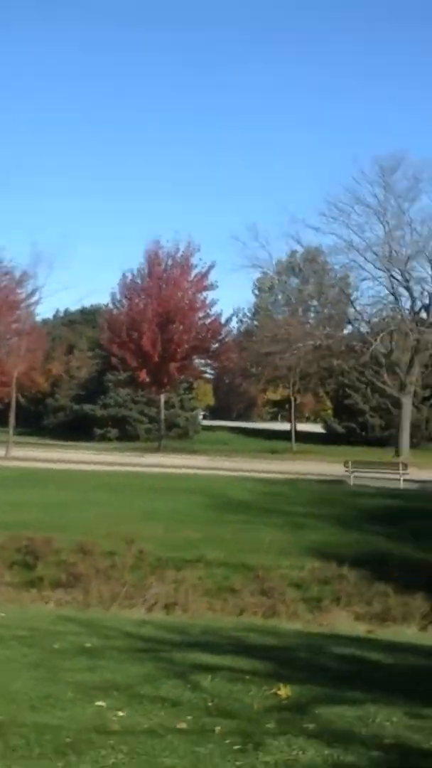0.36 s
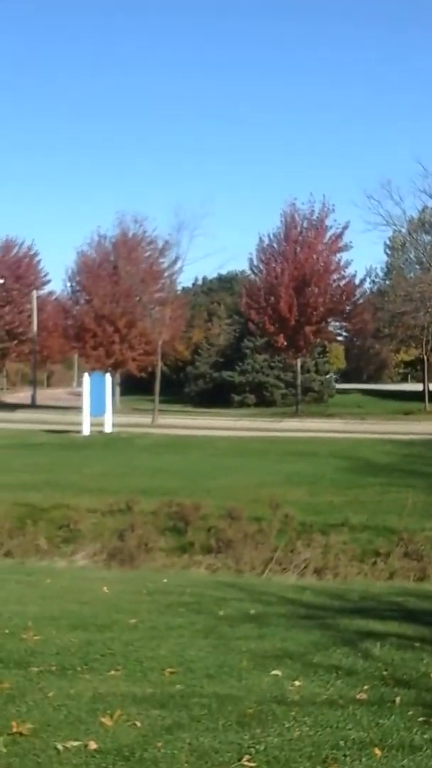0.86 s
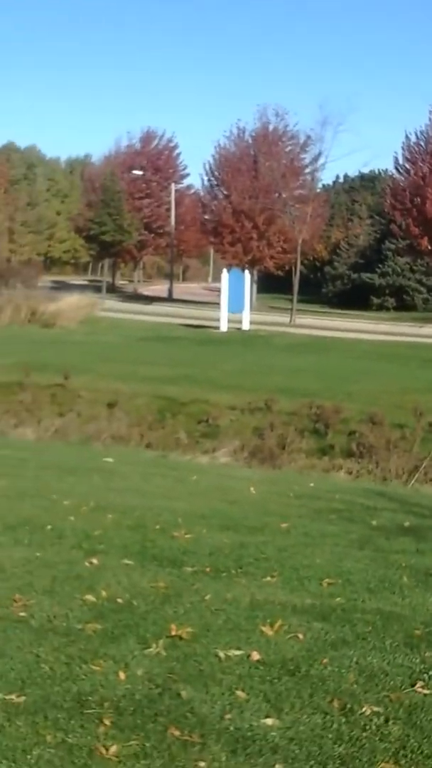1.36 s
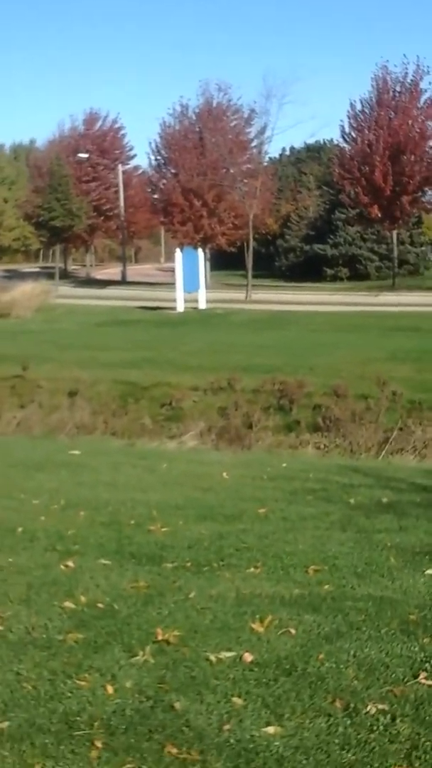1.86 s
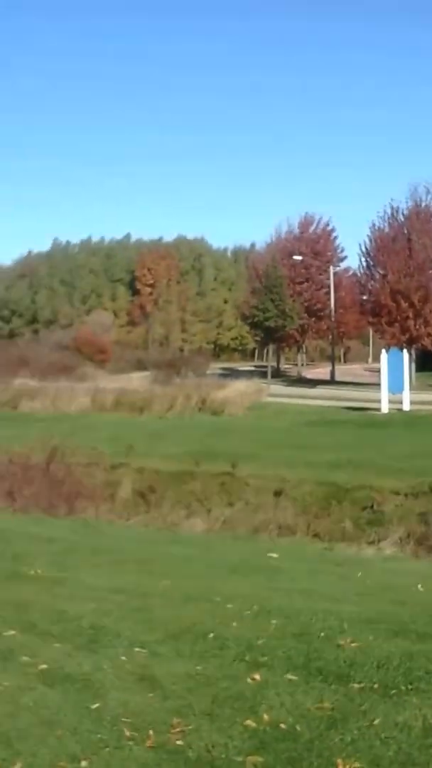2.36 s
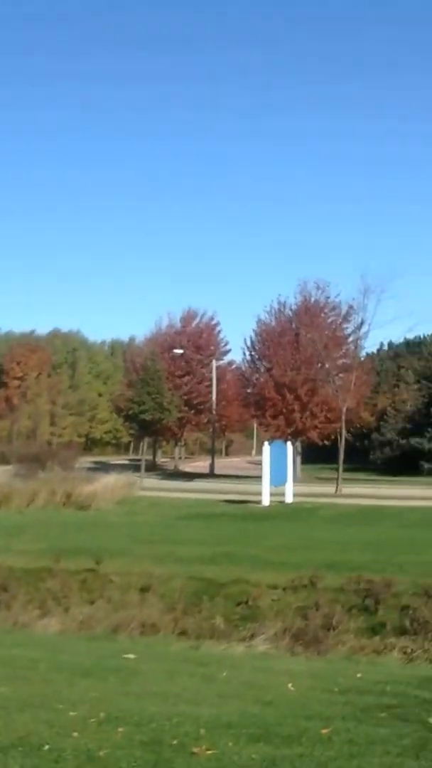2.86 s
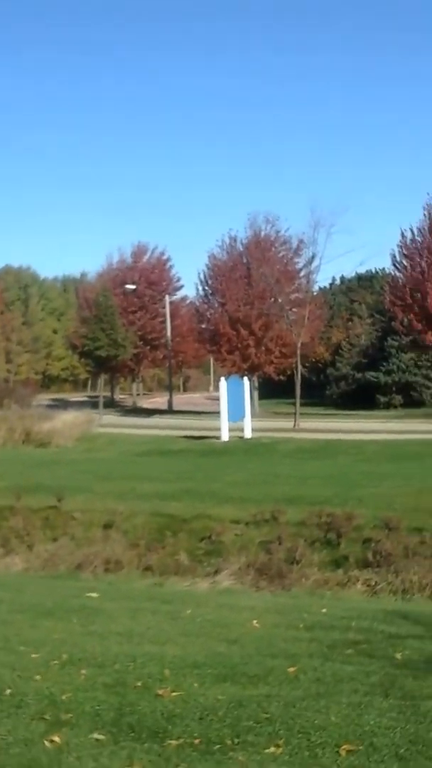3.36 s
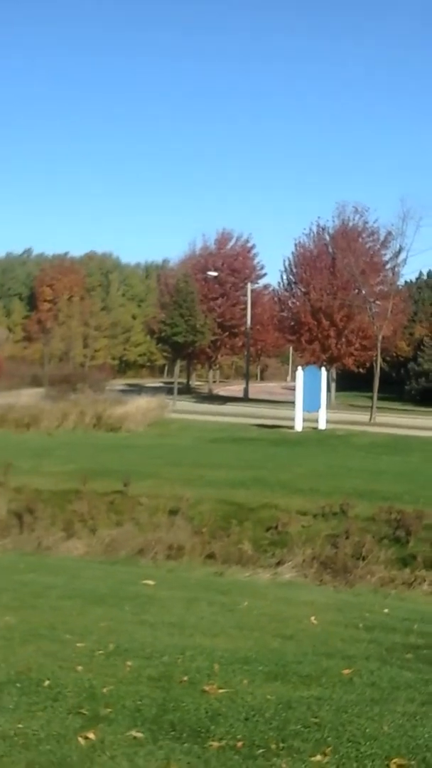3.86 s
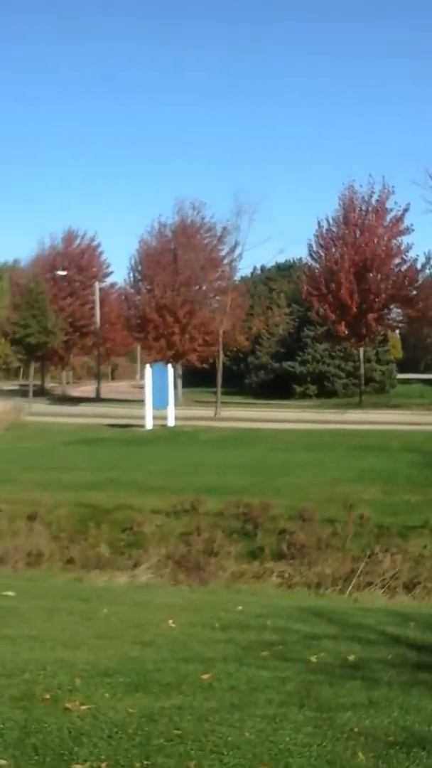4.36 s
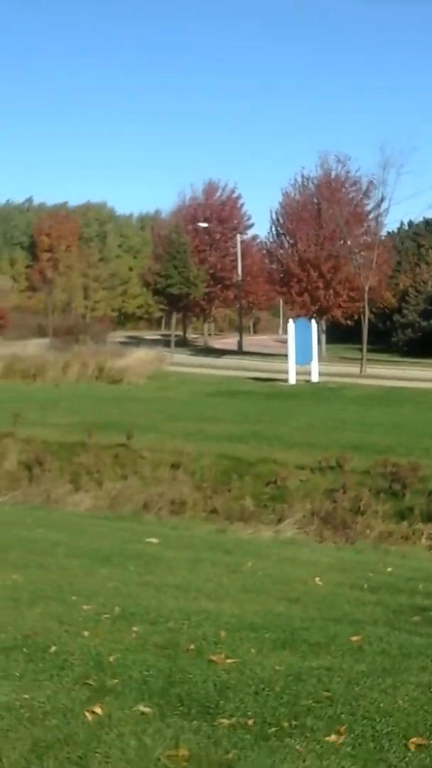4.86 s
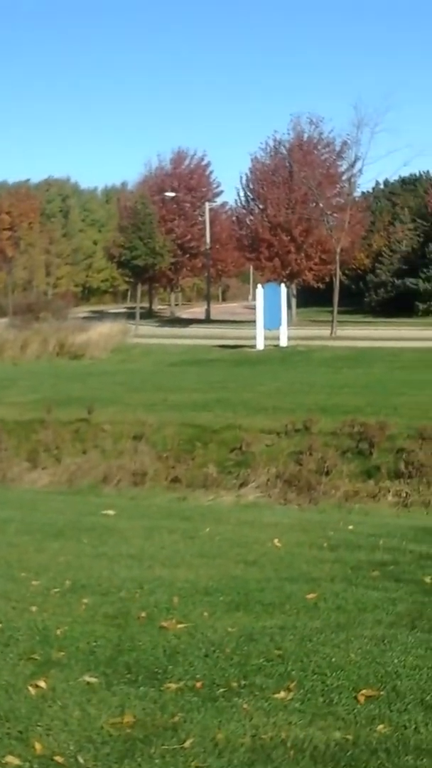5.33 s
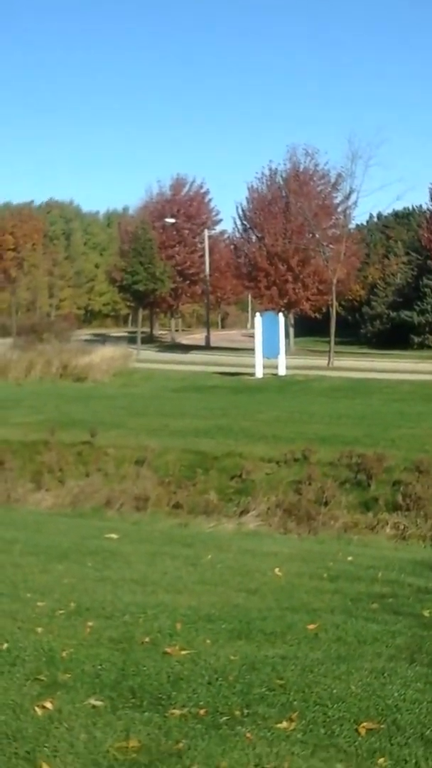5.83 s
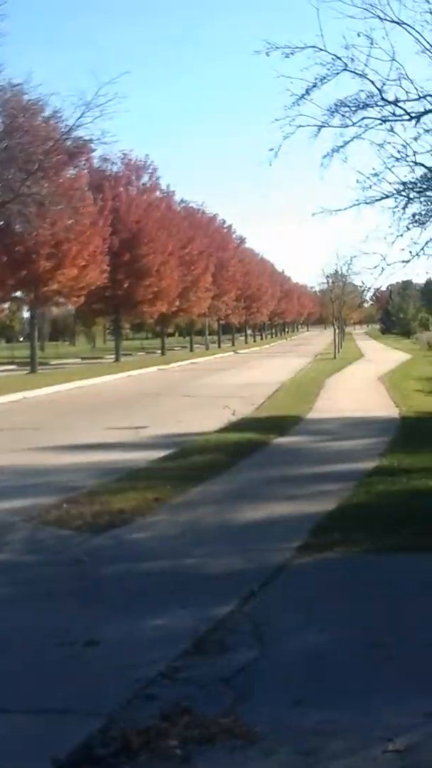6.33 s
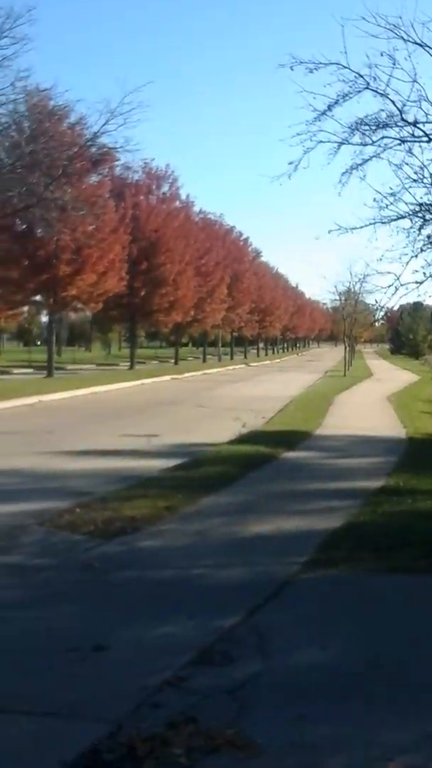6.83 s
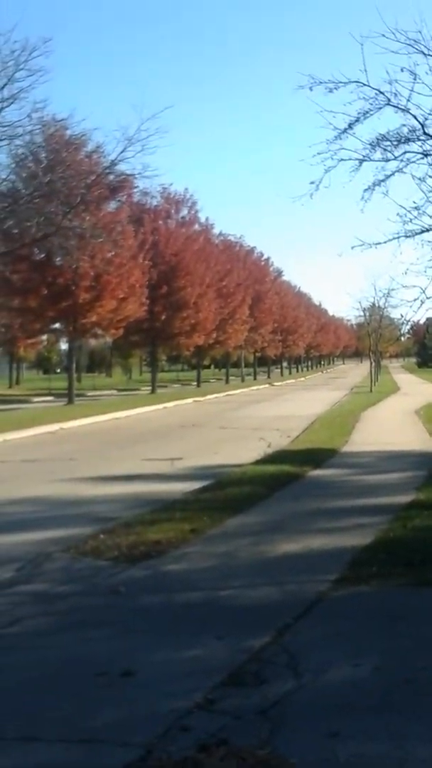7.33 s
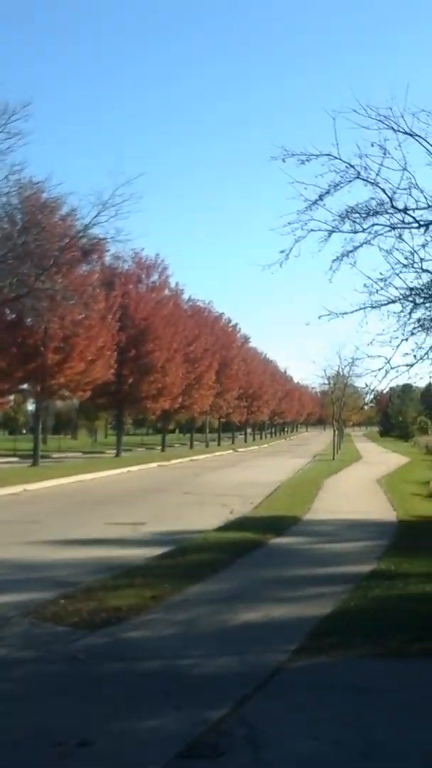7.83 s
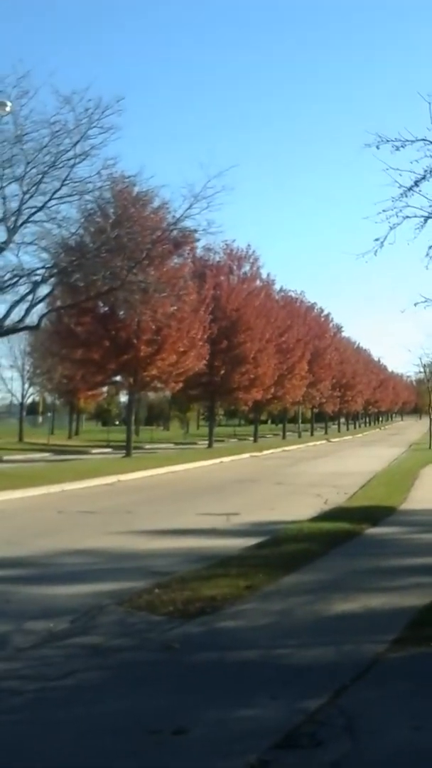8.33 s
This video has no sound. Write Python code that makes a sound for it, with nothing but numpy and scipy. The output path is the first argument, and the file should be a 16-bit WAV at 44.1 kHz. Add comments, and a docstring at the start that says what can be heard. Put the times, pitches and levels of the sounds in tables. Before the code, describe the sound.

Close handling noise outdoors, with muffled bumps, brief scuffs and sharp little clicks, a faint far engine midway and tiny metallic pings.

```python
"""A quiet park, heard from a phone carried by hand on a walk.
Each step and shift of grip jolts the case: damped, sagging sines make soft thumps, and millisecond
crackles through resonances make dry ticks. Clumped random grains through resonances make finger rumble,
scuff and rustle. Low noise bands follow the arm's swing, thin decaying sines are the pings of a small
metal tag, a wavering sine is a far engine, and smooth filtered noise is the hiss."""
import sys
import numpy as np
from scipy import signal
from scipy.io import wavfile

SR = 44100
rng = np.random.default_rng(int(sys.argv[2]) if len(sys.argv) > 2 else 0)


def undo_db(level):
    """Turn decibels back into plain size, where 20 dB means ten times bigger."""
    steps = np.asarray(level, float) / 20
    return 10 ** steps


def pcm_store(signal):
    """Save signal as 16-bit PCM."""
    levels = np.round(np.clip(np.atleast_2d(signal), -1, 1) * 32767)
    wavfile.write(sys.argv[1], SR, levels.astype(np.int16).T)


N = 383737   # length of the scene [samples]

# resonances of the microphone port: (frequency [Hz], width [Hz], level [dB])
PORT_MODES = [(4854, 1370, 4.5), (5985, 880, 6)]
# lower resonances of the case, under ticks and rustle: (frequency [Hz], width [Hz], level [dB])
LOW_CASE_MODES = [(3360, 5900, -14), (2338, 450, 8.5), (1115, 180, 5)]


def rms_one(x):
    """Scales a sound to an rms of 1."""
    return x / np.sqrt(np.mean(x ** 2) + 1e-20)


def in_time(rows):
    """Draws straight lines between the rows (time [s], values ..), one curve per value column."""
    s, *columns = np.transpose(rows)
    return [np.interp(np.arange(N) / SR, s, column) for column in columns]


def band(x, low_hz, high_hz):
    """Keeps the band between two frequencies."""
    edges_hz = [low_hz, min(high_hz, 0.45 * SR)]
    return signal.sosfilt(signal.butter(2, edges_hz, "band", fs=SR, output="sos"), x)


def drift(rate_hz):
    """Slow random wander with spread 1: noise through two equal poles at rate_hz."""
    hop = 40   # computed on every 40th sample, then interpolated
    pole = np.exp(-2 * np.pi * rate_hz * hop / SR)
    noise = rng.standard_normal(N // hop + 2002)
    slow = signal.lfilter([1], [1, -2 * pole, pole * pole], noise)[2000:]   # skip the settling
    return np.interp(np.arange(N) / hop, np.arange(len(slow)), rms_one(slow))


def resonate(x, modes):
    """Parallel resonances, each of gain 1 at its peak before its level, with alternating signs."""
    out = 0
    for k, (hz, width_hz, db) in enumerate(modes):
        r = np.exp(-np.pi * width_hz / SR)
        numerator = np.array([1, 0, -1]) * (1 - r * r) / 2
        denominator = [1, -2 * r * np.cos(2 * np.pi * hz / SR), r * r]
        ring = signal.lfilter(numerator, denominator, x + 1e-18)
        out = out + (-1) ** k * undo_db(db) * ring
    return out


def grains(per_s, spread_db):
    """Random impulses of uneven size and sign; a wandering density makes them come in clumps."""
    sizes = undo_db(spread_db * np.minimum(rng.exponential(1, N), 4)) * rng.choice([-1, 1], N)
    chance = per_s * undo_db(4.0 * drift(12)) / SR
    return sizes * (rng.random(N) < chance)


def add(out, s, sound):
    """Mixes a short sound into out at time s."""
    i = round(s * SR)
    out[i:i + len(sound)] += sound[:N - i]


def hiss(level_db):
    """Smooth noise of the electronics and the far air, shaped in half-octave bands."""
    # relative colour of the hiss: (frequency [Hz], density [dB per Hz])
    colour = [(250, -6), (660, -8), (1000, -9), (2000, -11.5), (4000, -12.5), (8000, -13), (15500, -15)]
    hz, db = np.transpose(colour)
    white = rng.standard_normal((2, N))   # neighbouring bands take different noise
    edges_hz = 200 * 2 ** np.arange(0, 7, 0.5)
    out = 0
    for k, (low, high) in enumerate(zip(edges_hz, edges_hz[1:])):
        band_db = np.interp(np.log(low * high) / 2, np.log(hz), db)   # read at the band's centre
        out = out + undo_db(band_db) * band(white[k % 2], low, high)
    return undo_db(level_db) * rms_one(out)


def hum():
    """A far engine's low firing tone, which wavers in pitch and level on its way through the air."""
    # the engine passing, before the waver: (time [s], level [dB])
    passing = [(0, -84), (3.4, -85), (3.65, -63), (4.3, -57), (4.8, -66.5), (5.25, -49), (5.6, -63),
               (5.9, -56), (8.7, -70.5)]
    db, = in_time(passing)
    pitch_hz = 73 + 2.1 * drift(4.2)
    phase = 2 * np.pi * np.cumsum(pitch_hz) / SR
    waver_db = 2.5 * drift(6)
    return np.sqrt(2) * undo_db(db + waver_db) * np.sin(phase)


def sway(sway_db, buffet_db):
    """The arm swings the phone through the air: lumpy pressure on the port, in two low noise bands."""
    slow, fast = rng.standard_normal((2, N))
    lumps = undo_db(2.0 * drift(12))
    swaying = undo_db(sway_db) * rms_one(band(slow, 23, 63.2))
    buffeting = undo_db(buffet_db) * rms_one(band(fast, 58.8, 95.3))
    return lumps * (swaying + buffeting)


def pings():
    """A tapped metal tag: one thin mode rings down until a touch takes most of it away."""
    # taps on the tag: (time [s], level [dB], time until the touch [s])
    taps = [(2.4144, -56, .022), (2.483, -54, 0.04), (2.79, -58, .016), (7.0858, -70, .02),
            (7.151, -59, 0.013), (7.639, -65, 0.0071), (7.678, -61.5, .04), (8.159, -57.5, 0.06),
            (8.226, -69, .016), (8.46, -58.5, .014)]
    ping_hz, t60_s, touch_drop_db = 7480, 0.1, -20
    out, t = np.zeros(N), np.arange(round(0.15 * SR)) / SR
    for s, db, free_s in taps:
        touch_db = touch_drop_db * np.clip((t - free_s) / 0.006, 0, 1)
        attack = np.clip(t / 0.0015, 0, 1)
        fade = attack * undo_db(db - 60 * t / t60_s + touch_db)
        add(out, s, fade * np.sin(2 * np.pi * ping_hz * t))
    return out


def slips():
    """Each slip of the fingers swells, holds and fades at shared rates above the resting hand's level."""
    # separate slips over the case:
    # (time [s], hold [s], rumble level [dB], scuff level [dB], rustle level [dB])
    slides = [(0.0, 0.022, -56, -73, -66), (.175, 0.16, -46.5, -65, -71), (0.331, 0.041, -41.5, -56, -61),
              (0.463, 0.032, -38, -56, -53), (.6, .08, -43.5, -62, -67.5), (.71, 0.11, -46, -68, -66),
              (.85, 0.064, -48, -65.5, -71.5), (1.059, 0.027, -43, -63.5, -64.5),
              (1.208, 0.028, -44.5, -62, -60.5), (1.28, 0.024, -46, -72, -67), (1.38, 0.19, -61, -78, -74),
              (1.7, 0.024, -51, -69, -65.5), (1.885, 0.014, -51, -67, -64.5), (2.05, 0.062, -60, -74, -70),
              (2.215, 0.074, -45.5, -63.5, -69.5), (2.359, 0.045, -43.5, -65.5, -61.5),
              (2.439, 0.026, -38.5, -57, -61), (2.635, 0.039, -47, -69, -65),
              (2.798, 0.054, -50.5, -65.5, -60.5), (2.95, .04, -52.5, -79, -72),
              (3.03, .06, -60, -72, -64.5), (3.215, 0.018, -51, -69, -67), (3.34, 0.022, -54.5, -80, -74),
              (3.42, 0.048, -49, -68, -66.5), (3.55, 0.066, -49.5, -72, -68), (3.73, .04, -50, -67.5, -70),
              (3.829, 0.027, -49, -66, -66), (3.99, .07, -52, -73, -71), (4.17, 0.13, -55, -69, -66),
              (4.33, 0.051, -48, -74, -68.5), (4.43, 0.035, -49, -67, -61.5),
              (4.57, 0.053, -54, -76, -70.5), (4.98, 0.049, -62, -73, -76), (5.2, .05, -54.5, -80, -74),
              (5.3, 0.033, -50, -70, -66), (5.46, 0.033, -65, -85, -79), (5.62, 0.017, -57, -93, -87),
              (5.74, 0.021, -48, -65, -67), (5.89, 0.014, -58, -78, -69), (5.96, 0.016, -64, -76, -73),
              (6.17, .19, -54, -77, -66), (6.41, 0.064, -46.5, -69, -68), (6.62, .04, -46.5, -66, -66.5),
              (6.68, 0.035, -45.5, -68, -60), (6.771, 0.029, -47, -67, -57.5), (6.85, .25, -60, -79, -70),
              (7.145, 0.026, -53.5, -71, -72), (7.289, 0.039, -51.5, -88, -68),
              (7.45, 0.011, -69, -85, -81), (7.82, 0.026, -64, -82, -71.5), (7.91, 0.032, -53, -76, -67),
              (8.432, 0.02, -44.5, -61, -58)]
    rise_db_per_s, fall_db_per_s = 454, 312
    resting_db = -67.5, -91, -87   # rumble, scuff, rustle
    t = np.arange(0, N, 64) / SR
    s, held, *columns = np.transpose(slides)[:, :, None]
    before = np.maximum(s - t, 0)
    after = np.maximum(t - s - np.maximum(held, 0), 0)
    shape_db = -rise_db_per_s * before - fall_db_per_s * after
    curves = []
    for db, still_db in zip(columns, resting_db):
        loudest = undo_db(db + shape_db).max(axis=0)   # overlapping slips do not add up
        level_db = 20 * np.log10(undo_db(still_db) + loudest)
        curves.append(np.interp(np.arange(N) / SR, t, level_db))
    return curves


def rustle(level_db):
    """Skin slides on plastic: dense fine grains through the port resonances, with a thin bright edge."""
    rubbing = grains(6000, spread_db=4.0)
    port = resonate(resonate(rubbing, PORT_MODES), [(4870, 6200, 0.0054)])
    low = undo_db(-8) * resonate(rubbing, LOW_CASE_MODES)
    edge = undo_db(-9.0) * band(rubbing, 5000, 13000)
    flutter_db = 2.5 * drift(25)
    return undo_db(level_db + flutter_db) * rms_one(port + low + edge)


def scuff(level_db):
    """Rubbing excites the middle modes of the case in coarse crunches: sparser grains."""
    # middle modes of the case: (frequency [Hz], width [Hz], level [dB])
    middle_modes = [(787, 340, 12.5), (1000, 870, -1.5)]
    rubbed = band(resonate(grains(600, spread_db=3.5), middle_modes), 414, 1060)
    return undo_db(level_db) * rms_one(rubbed)


def rumble(level_db):
    """Fingers roll over the case: dense small jolts, unrelated from one resonance to the next."""
    # low resonances of the held case: (frequency [Hz], level [dB])
    low_modes = [(105, 8.5), (140, 3.5), (200, 2), (280, -5.5), (400, -21)]
    clump = undo_db(3.5 * drift(30))
    rings = 0
    for hz, db in low_modes:
        once = resonate(grains(500, spread_db=3.0), [(hz, 0.54 * hz, db)])
        rings = rings + resonate(once, [(hz, 0.62 * hz, 0)])   # a second pass steepens the skirts
    return undo_db(level_db) * rms_one(clump * rings)


def ticks():
    """A tick is milliseconds of crackle; the port rings most, with a low and a bright part."""
    # ticks of skin and plastic, levels ahead of the resonances:
    # (time [s], level [dB], low part [dB re level], bright part [dB re level])
    touches = [(0.1704, -46, -23, -23), (0.2077, -44, -6, -29), (0.4756, -24, -16, -34),
               (0.5828, -41.5, -1, -17), (0.6964, -44, -14, -26), (1.2024, -37, -12, -26),
               (1.2162, -38, -20, -45), (1.2229, -41, -20, -22), (1.6122, -52.5, 11.5, -25),
               (1.7274, -45.5, -4, -11), (3.3441, -46, 5, -13), (3.7435, -31, -6.5, -23),
               (3.7832, -49, -23, -27), (3.8483, -33.5, 0, -8), (3.9948, -41, 3.5, -23),
               (4.6211, -41.5, -1, -14), (5.2317, -44, -19.5, -32), (5.5666, -43, 3.5, -35),
               (5.6211, -51.5, -14, -24), (5.7192, -52, -15, -26), (5.7443, -40, 2, -33),
               (5.9701, -47, -7, -28), (6.1609, -48, 2, -1), (6.4484, -41, -12, -27),
               (6.6178, -37, -7, -25), (6.626, -39.5, -4, -25), (6.6419, -23, -14, -28),
               (6.783, -35.5, -20, -9), (6.915, -49, -14, -25), (7.0038, -45, 0, -27),
               (7.044, -50, -21, -25), (7.1629, -35.5, -7.5, -15), (7.9241, -49, -3, -20),
               (7.9501, -45, -9, -7), (8.1596, -53, -18, -7), (8.3715, -52, -28, -21),
               (8.4175, -33, -32, -16), (8.4302, -28.5, -1.5, -11.5)]
    # main clicks of double clicks, as of a loose part in the case, same columns:
    # (time [s], level [dB], low part [dB re level], bright part [dB re level])
    clicks = [(2.0945, -33, -4.5, -16), (2.3065, -33.5, -9, -19), (2.6448, -32, -4.5, -16),
              (2.9765, -49, -12, -26), (3.012, -31.5, -2, -23), (3.237, -34, -5, -23),
              (4.0553, -37.5, -2, -16), (4.4774, -42, 5, -8), (5.7578, -31, 0.5, -10.5),
              (6.466, -36.5, -3, -25), (8.424, -22, -11, -22.5)]
    lead_s, lead_db = 0.0031, -8   # a lighter touch comes before each main click
    faint_count, faint_db, faint_spread_db = 40, -53.5, 4
    faint_low_db, faint_bright_db = -20, -22

    t = np.arange(round(0.006 * SR)) / SR
    shape = np.exp(-t / 0.0011) * (1 - np.exp(-t / 0.0001))
    leads = [(s - lead_s, db + lead_db, *colour) for s, db, *colour in clicks]
    faint = []   # faint ticks fall at random
    for place, size in rng.random((faint_count, 2)):
        db = faint_db + faint_spread_db * (size - 0.5)
        faint.append((place * (N - len(t)) / SR, db, faint_low_db, faint_bright_db))
    rows = touches + clicks + leads + faint

    port, low, bright = np.zeros((3, N))
    for (s, db, low_db, bright_db), crackle in zip(rows, rng.standard_normal((len(rows), len(t)))):
        burst = shape * crackle
        burst = undo_db(db) * burst / np.sqrt(np.sum(burst ** 2))   # equal energy at equal level
        add(port, s, burst)
        add(low, s, burst * undo_db(low_db))
        add(bright, s, burst * undo_db(bright_db))
    port_ring = undo_db(17) * resonate(port, PORT_MODES)
    low_ring = undo_db(14) * resonate(low, LOW_CASE_MODES)
    return port_ring + low_ring + undo_db(16) * band(bright, 7300, 13000)


def thumps():
    """The hand damps each jolt within a cycle or two; its pitch sags as the contact softens."""
    # jolts of the case, levels ahead of a common gain, pitch ahead of the sag:
    # (time [s], level [dB], nominal pitch [Hz], case knock [dB re level])
    jolts = [(0.0928, -34, 162, -18.5), (0.1714, -22.5, 257, -11), (0.3236, -25, 196, -15),
             (0.476, -17.5, 187, -15.5), (0.583, -24, 219, -25), (0.6152, -31, 162, -17),
             (0.764, -27.5, 178.0, -30), (0.9984, -35.5, 206, -10.5), (1.051, -35, 185, -15),
             (1.2038, -21, 212, -8), (1.404, -37.5, 235, -11), (1.4747, -26, 201, -29.5),
             (1.534, -36, 146.0, -20.5), (1.6133, -30, 226, -9.5), (1.706, -31, 140, -11.5),
             (1.791, -37, 194, -12), (2.0605, -41, 200.0, -7.5), (2.094, -38.5, 156, -14),
             (2.205, -35, 184, -11.5), (2.3577, -25, 226, -9), (2.448, -38, 193, -19),
             (2.583, -28.5, 167, -27.5), (2.6461, -36.5, 189, -17), (2.741, -34.5, 164, -19),
             (2.812, -37, 189, -19), (2.944, -38.8, 288, -11), (2.9723, -33.5, 143, -20),
             (3.014, -35.5, 152, -15.5), (3.0556, -35.5, 169, -6.5), (3.3474, -33, 182, -25),
             (3.413, -36, 240, -16), (3.434, -32.5, 252, -16), (3.5431, -32.5, 194, -11.5),
             (3.615, -32, 170, -21), (3.7467, -26, 190, -22), (3.848, -29, 202, -5.5),
             (3.997, -33.5, 151.0, -14), (4.1922, -35, 165, -22.5), (4.274, -31, 143, -21.5),
             (4.4809, -37, 156, -13.5), (4.981, -43.5, 195, -6), (4.9995, -33.5, 173, -21.5),
             (5.0358, -44.5, 186, -3.5), (5.234, -30.5, 151.0, -28.5), (5.5706, -35.5, 283, -19),
             (5.6242, -30, 131, -33), (5.722, -34, 118, -25), (5.761, -23, 197, -19.5),
             (5.8907, -37, 137, -12), (5.9715, -28, 141, -13.5), (6.0968, -36.5, 137, -21),
             (6.1609, -32.5, 180, -7.5), (6.4665, -33, 131, -10), (6.6219, -26.5, 134, -24),
             (6.6391, -32, 138, -3.5), (6.784, -29, 170, -10), (6.8858, -27.5, 225, -19.5),
             (6.9426, -37.5, 256, -19.5), (7.1651, -32.5, 157, -26.5), (7.28, -32, 187, -14.5),
             (7.3376, -31.5, 171, -25), (7.824, -41, 167, -16), (7.902, -29.5, 164, -29.5),
             (7.9247, -47.5, 188, 4.5), (8.419, -33, 190, -7), (8.4299, -21, 124, -21.5),
             (8.465, -33, 128, -25), (8.6204, -37, 225, -18.5)]
    case_hz, knock_t60_s = 747, 0.019   # the case's knock, before detuning
    out, t = np.zeros(N), np.arange(round(0.08 * SR)) / SR
    for (s, db, hz, knock_db), draw in zip(jolts, rng.random((len(jolts), 3))):
        rise_s = 0.0005 * undo_db(-0.8 * (knock_db + 14))   # a jolt with little knock lands softly
        # from 1.84 times the nominal pitch down to 0.69 times
        turns = hz * (0.69 * t + 0.0023 * (1 - np.exp(-t / 0.002)))
        swell = (1 - np.exp(-t / rise_s)) ** 2
        push = np.sin(2 * np.pi * turns) * np.exp(-hz * t / 0.78) * swell
        knock_hz = case_hz * (0.88 + 0.24 * draw[1])   # the grip detunes the case
        knock_fade = undo_db(-60 * t / knock_t60_s - 4.0)
        ring = np.sin(2 * np.pi * knock_hz * t) * knock_fade * np.sign(draw[2] - 0.5)
        edge = np.sin(2 * np.pi * 1150 * t) * np.exp(-t / 0.0005)   # the hard first contact
        polarity = 1 if draw[0] < 0.6 else -1
        add(out, s - rise_s, polarity * undo_db(db + 4.0) * (push + undo_db(knock_db) * (ring + edge)))
    return out


def scene():
    """Mixes the hand on the case with the swing, the tag, the engine and the hiss, in mono."""
    # the swing of the arm and the broad hiss:
    # (time [s], sway level [dB], buffet level [dB], hiss level [dB])
    swing = [(0.0, -50.5, -49.5, -62.5), (0.75, -46, -43, -60.5), (0.92, -48.5, -53, -62),
             (0.98, -52, -59, -64), (1.7, -64, -50.5, -65), (2.1, -56.5, -68, -68),
             (2.35, -53.5, -61.5, -63.5), (3.3, -59, -57.5, -66), (3.75, -57.5, -52, -64.5),
             (4.34, -51.5, -54.5, -64), (4.8, -69, -59.5, -68.5), (5.21, -57, -62, -65),
             (5.9, -68, -59.5, -66.5), (6.2, -59, -47.5, -63), (6.52, -37, -43.5, -61.5),
             (6.62, -58, -48.5, -62), (6.81, -51, -43, -60), (6.9, -53.5, -54, -64),
             (7.34, -54.5, -67, -65.5), (7.61, -63.5, -62, -68.5), (8.7, -61.5, -64, -67.5)]
    rumble_db, scuff_db, rustle_db = slips()
    sway_db, buffet_db, hiss_db = in_time(swing)
    hand = thumps() + ticks() + rumble(rumble_db) + scuff(scuff_db) + rustle(rustle_db)
    around = sway(sway_db, buffet_db) + pings() + hum() + hiss(hiss_db)
    return (hand + around)[None, :]


def roll_off(x):
    """The treble ends steeply here."""
    return signal.sosfilt(signal.butter(12, 16790, fs=SR, output="sos"), x)


def record(dry):
    """The top of the finished mix is cut steeply, 30 dB down from 15750 Hz upward."""
    steep = signal.cheby2(14, 30, 15750, fs=SR, output="sos")
    mix = signal.sosfilt(steep, dry)
    return roll_off(mix)


dry = scene()
out = record(dry)
pcm_store(out)
```